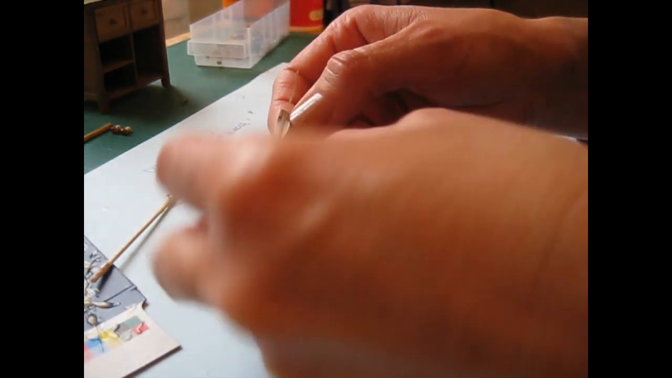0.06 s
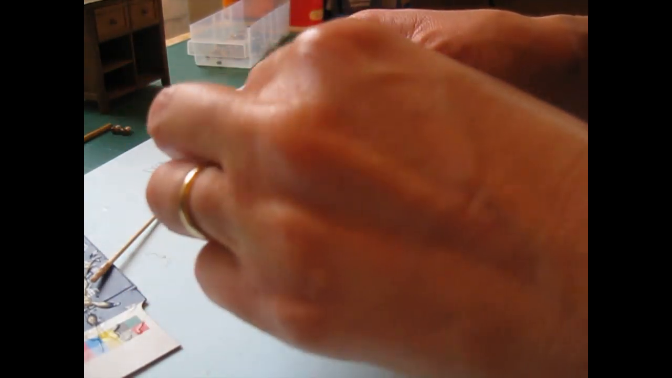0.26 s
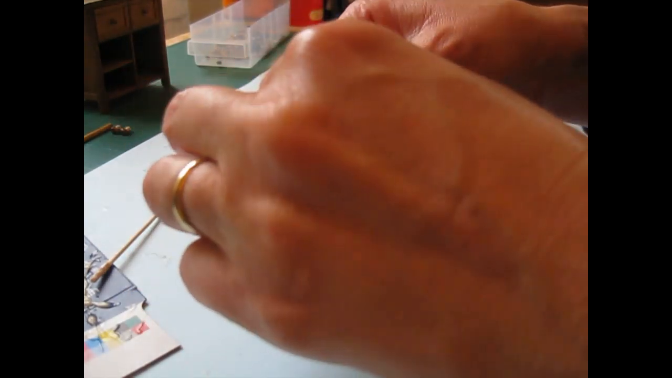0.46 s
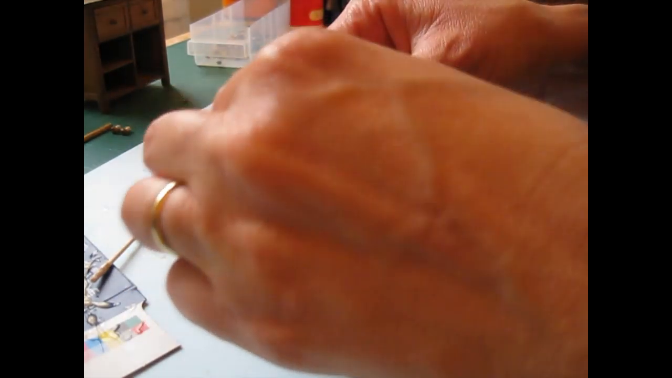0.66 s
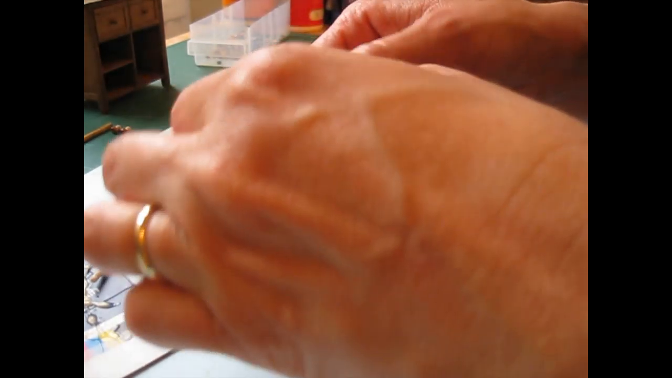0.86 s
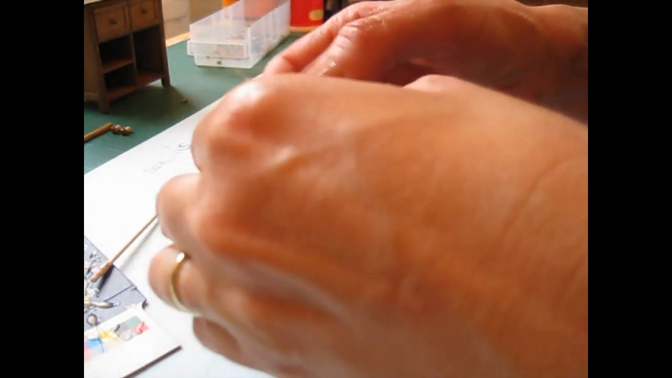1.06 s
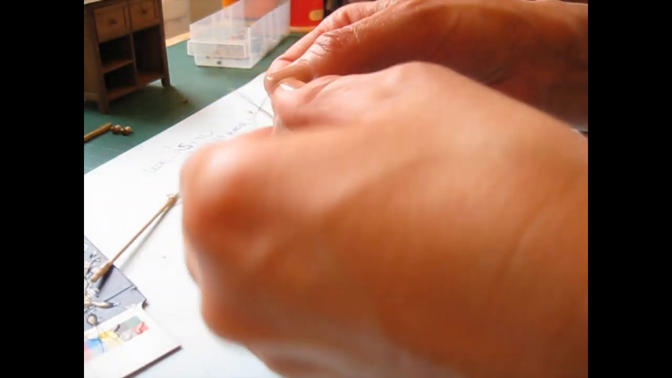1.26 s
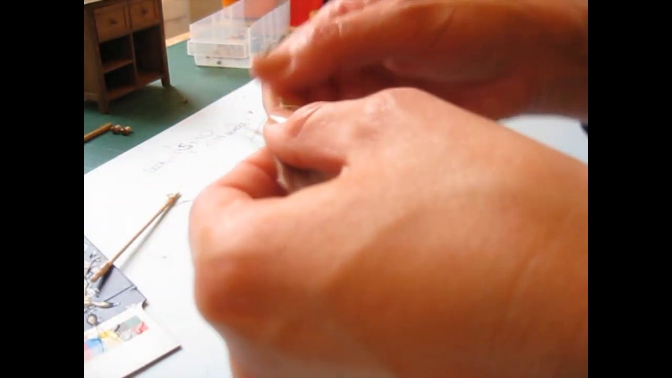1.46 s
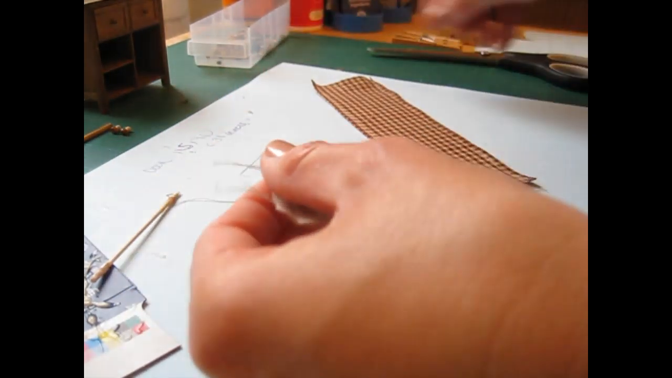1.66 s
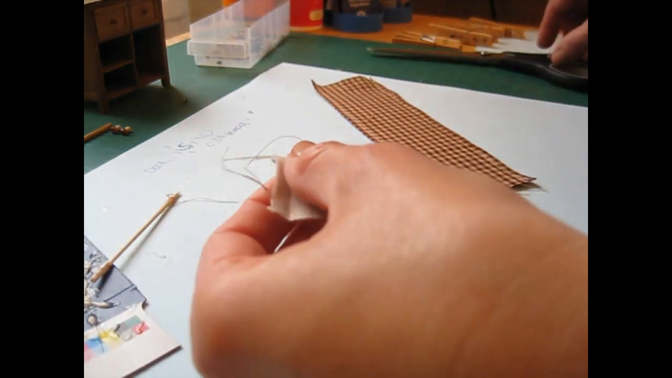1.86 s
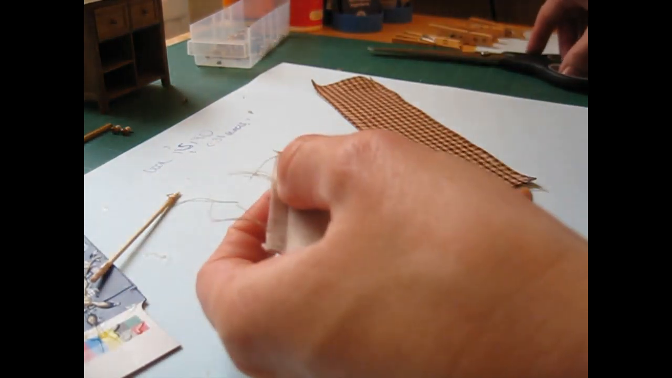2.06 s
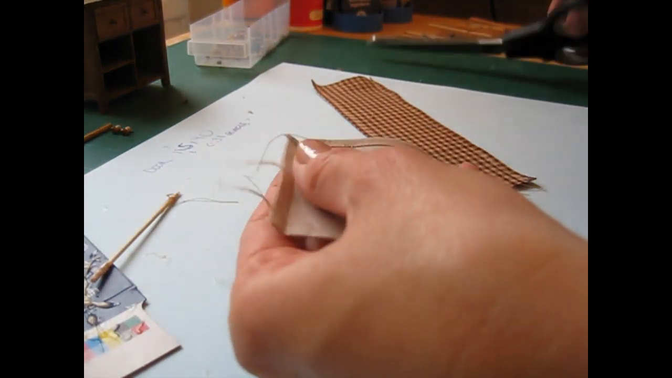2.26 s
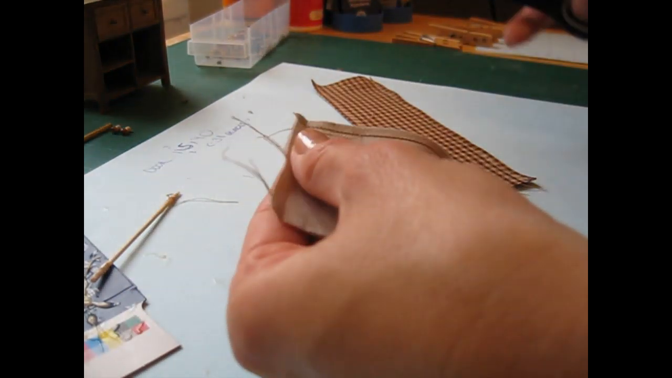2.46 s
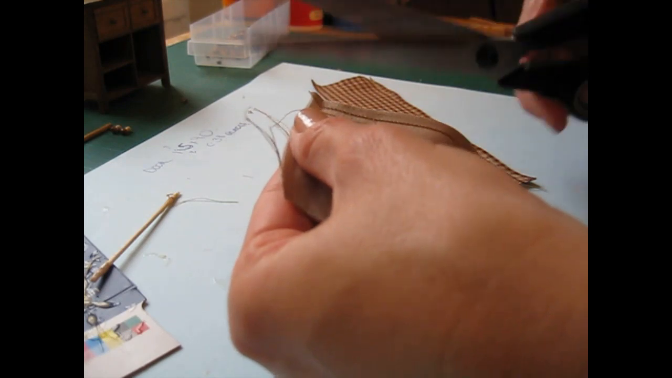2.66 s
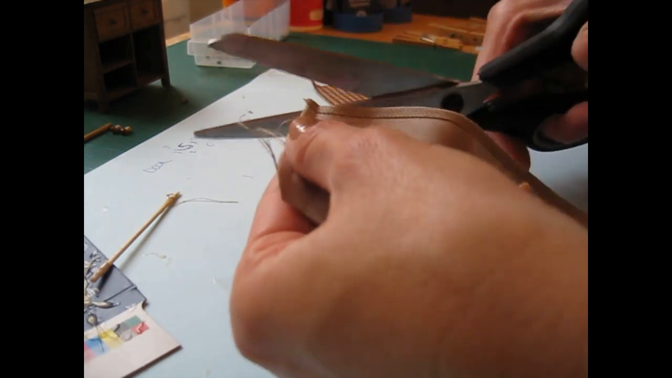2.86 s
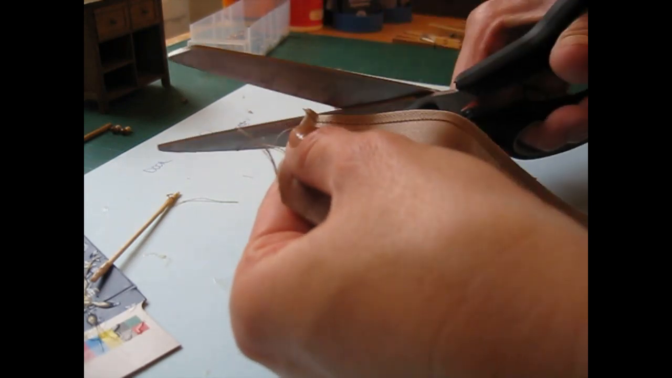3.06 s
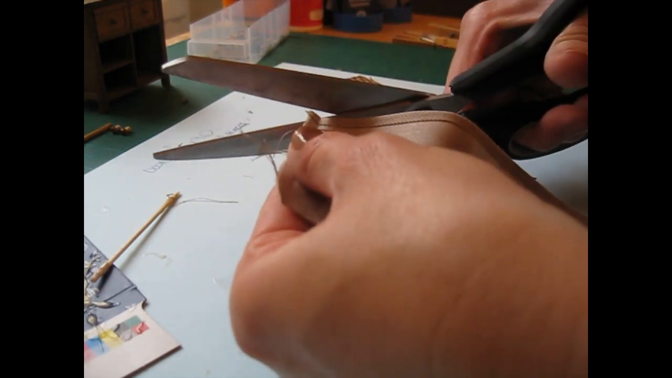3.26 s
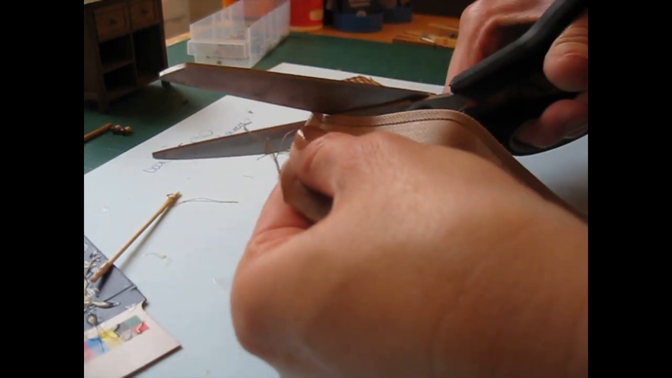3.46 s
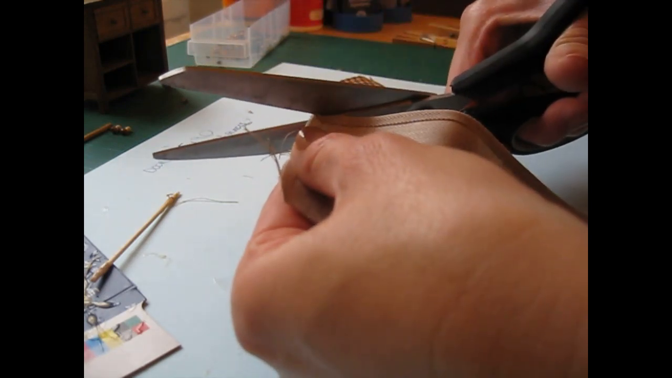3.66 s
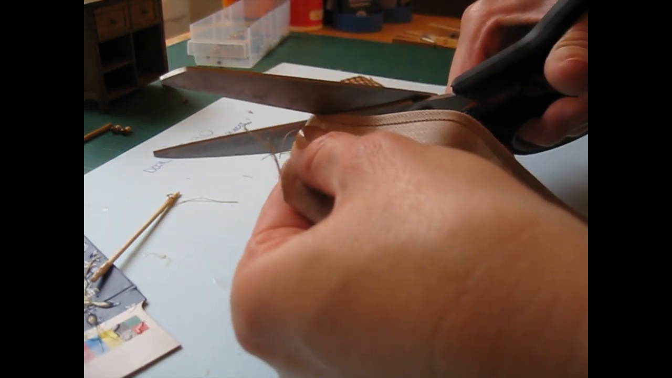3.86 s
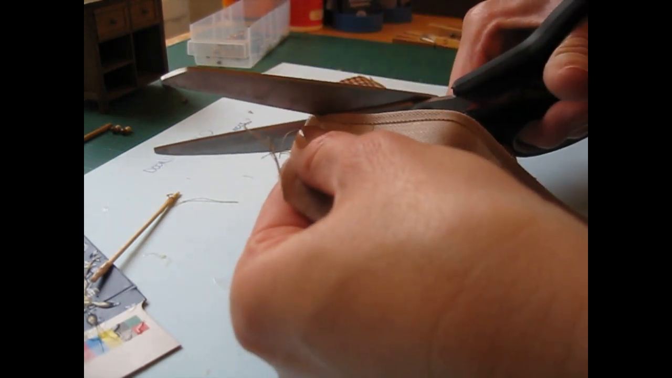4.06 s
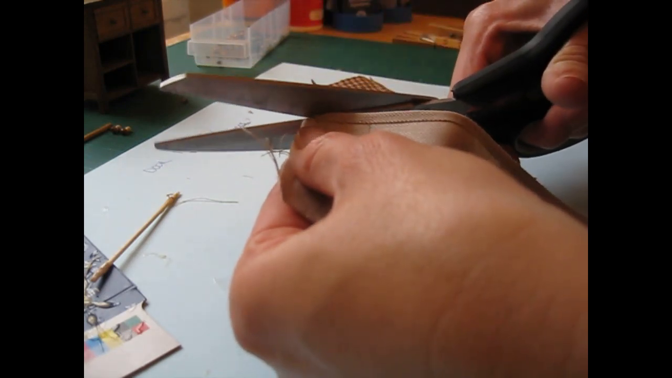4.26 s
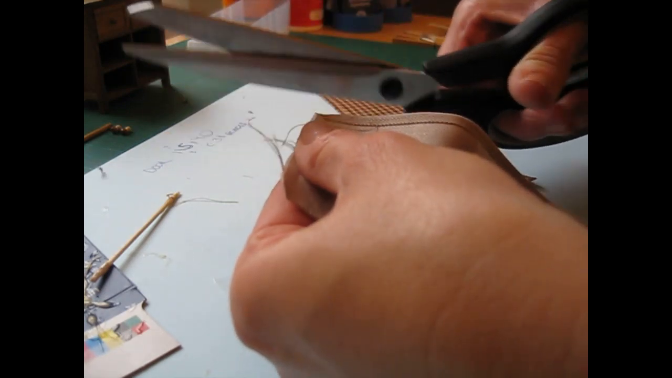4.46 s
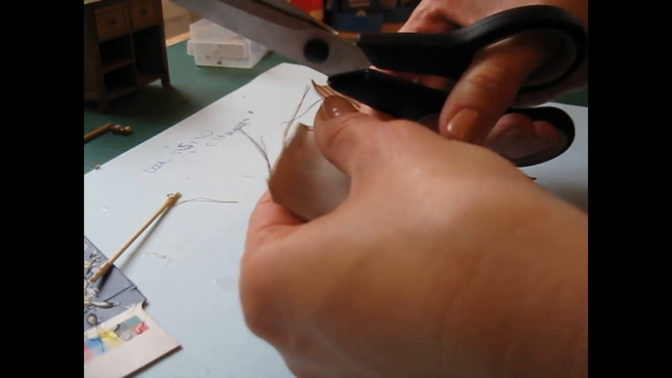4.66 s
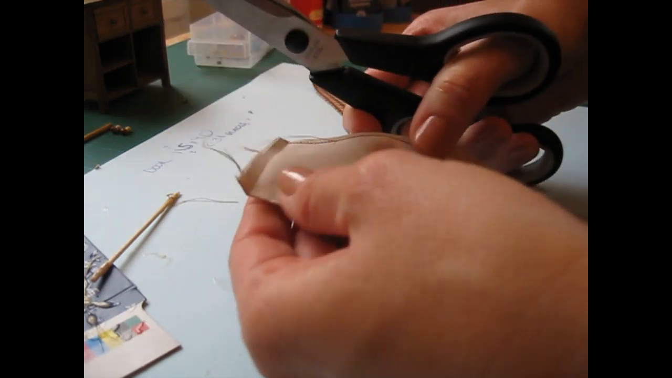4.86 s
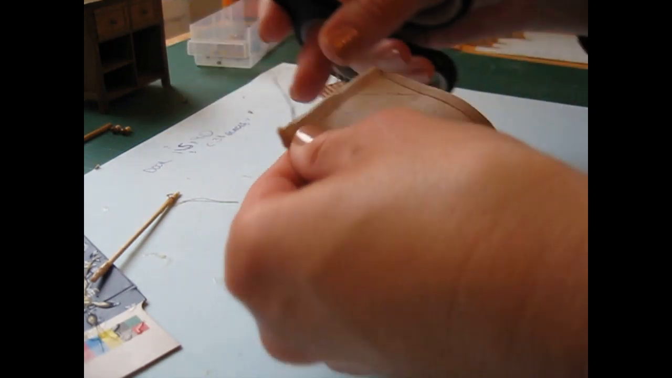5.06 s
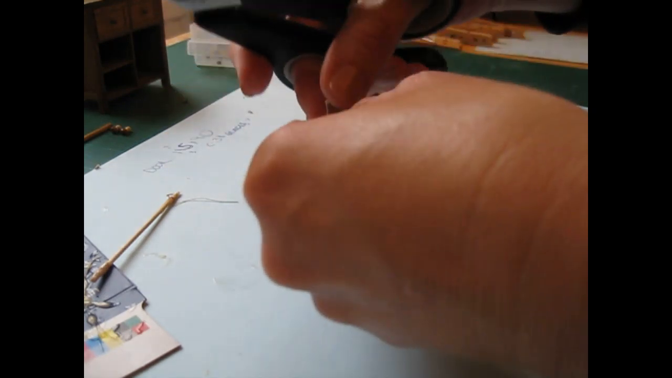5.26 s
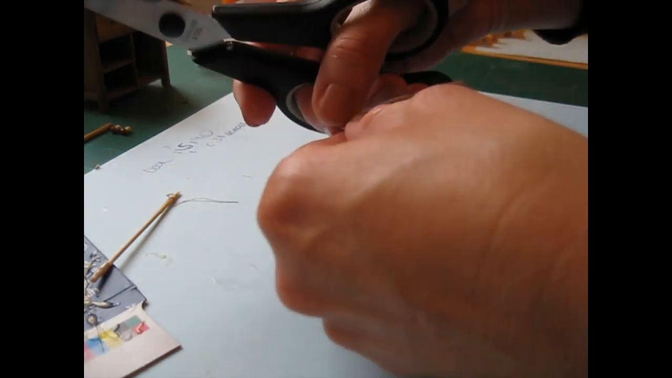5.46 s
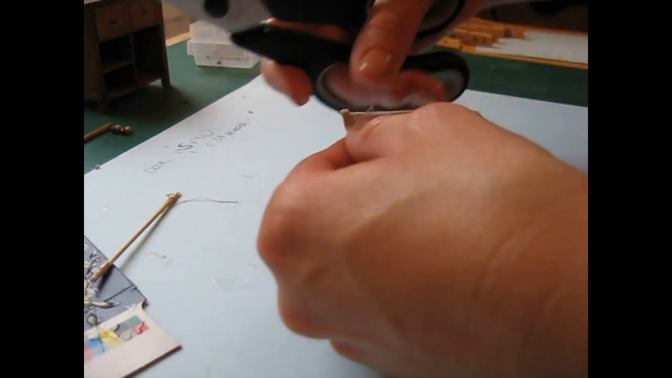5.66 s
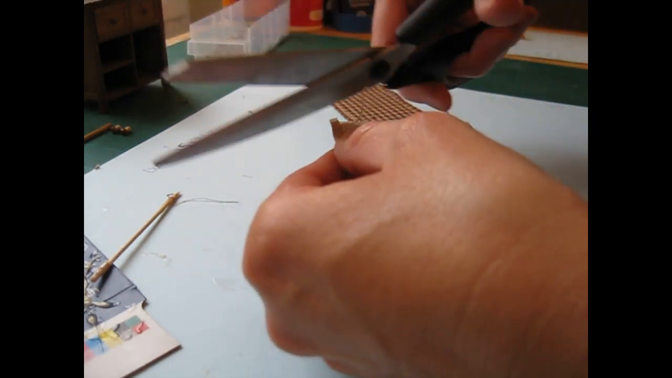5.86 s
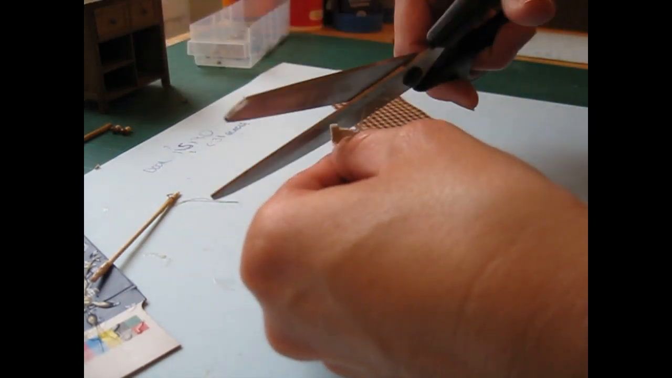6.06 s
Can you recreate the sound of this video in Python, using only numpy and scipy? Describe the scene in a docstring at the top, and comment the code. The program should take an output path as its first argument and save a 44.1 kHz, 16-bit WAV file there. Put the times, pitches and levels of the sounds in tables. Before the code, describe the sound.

A steady, low hiss fills a small, dry room, with everything heard close up. From about 0.3 seconds, fingers fold a scrap of fabric in a few very soft rubs that continue until just past 2 seconds. Between 1.8 and 2.2 seconds, large scissors are picked up from a work table: light knocks, steel ticks and two tiny drags end in a loud knock that briefly rings the tabletop. From 2.4 to 2.7 seconds the blades open in short rasps, the strongest bright and near the end. After a pause, they creep shut in faint scraping pushes from 3.8 to 4.3 seconds, with a thin, rising squeal. One sharp snip cuts a thread at 4.4 seconds, followed by a few tiny clicks. A soft rub, scrape and tick come at 5 seconds, another faint rub at 5.6, and the blades reopen with a brief high squeak at 5.8.

```python
"""Soft rubs of fabric come first: hands fold a scrap close to a small camera.
Large scissors knock and drag on a work table as they are picked up; the steel ticks, the top rings.
The blades rasp open, slide slowly shut with a thin squeal and trim a thread with a sharp snip.
A small, dry room and a steady hiss lie behind it all."""
import sys
import numpy as np
from scipy import signal
from scipy.io import wavfile
from scipy.ndimage import uniform_filter1d

SR = 44100
rng = np.random.default_rng(int(sys.argv[2]) if len(sys.argv) > 2 else 0)


def pcm_store(signal):
    """Save signal as 16-bit PCM."""
    levels = np.round(np.clip(np.atleast_2d(signal), -1, 1) * 32767)
    wavfile.write(sys.argv[1], SR, levels.astype(np.int16).T)


N = 269892

# blades meet or the loose pivot shifts (time [s], level [dB])
CLICKS = [(1.997, -40.5), (2.0505, -41), (2.0766, -39.5), (2.0986, -41.5), (4.4264, -21.5), (4.5060, -39.5),
          (4.5113, -36.5), (4.6196, -47), (5.0508, -46.5)]
# steel snap at full pitch (frequency [Hz], level [dB])
SNAP_SPECTRUM = [(300, -43), (2000, -25), (3100, -19), (3900, -5.5), (4750, 5.5), (5700, -5), (6500, -1),
                 (7500, -12.5), (9500, -17.5), (11500, -14), (13500, -26), (16000, -37)]
# ring after a snap, at full pitch (frequency [Hz], level [dB], t60 [s])
SNAP_MODES = [(4510, -17, 0.14), (4620, 5, 0.21), (5200, 1, .11), (6280, 15, 0.069), (6030, -3, .08)]
# thumb pulls the blades apart (start [s], length [s], level [dB], pitch [ratio])
OPENINGS = [(2.364, .072, -53, 0.98), (2.533, 0.028, -47, 0.61), (2.557, 0.049, -52.5, .75),
            (2.683, 0.018, -33.5, 1.0), (2.704, .016, -41.5, 0.96), (4.999, 0.049, -53.5, 0.83),
            (5.808, 0.025, -45, 0.37)]
# blades creep shut in small pushes (start [s], length [s], level [dB])
CLOSINGS = [(3.841, .025, -62.5), (3.936, 0.03, -53.5), (4.129, 0.038, -53), (4.176, 0.1, -54),
            (4.295, .031, -45.3)]
# hiss of the edges before tilt (frequency [Hz], level [dB])
EDGE_SPECTRUM = [(200, -22), (700, -14), (1900, 3), (2700, -5.5), (4000, 2), (4600, 3), (5500, 1.5),
                 (6050, 1), (6500, 0), (7250, -4), (8800, -3.5), (10000, -7), (12500, -5.5), (16000, -7.5)]
# blade resonances at pitch 1 (frequency [Hz], width [Hz], peak [dB])
BLADE_RESONANCES = [(1490, 190, 1), (1870, 130, 0), (2450, 290, 1), (3320, 110, 6.5), (3900, 770, -3.5)]
# finger settles in the handle (time [s], rise [s], fall [s], level [dB])
GRIPS = [(2.553, 0.0035, 0.0021, -44)]
# rubbed handle (frequency [Hz], level [dB])
HANDLE_SPECTRUM = [(100, -22), (350, -8), (550, 3), (850, -17), (2000, -48), (16000, -60)]
# singing edges (frequency [ratio], level [dB])
SQUEAL_PARTIALS = [(1, 2.5), (.83, -12), (1.88, -4)]
# stick-slip chirps (middle [s], centre frequency [Hz], level [dB])
SQUEAKS = [(2.719, 9350, -49), (4.327, 9200, -49), (4.33, 1410, -53), (5.8155, 14000, -49),
           (5.8255, 10300, -36.5)]
# scissors and fingers hit the table (time [s], table level [dB], tick level [dB], hardness [Hz])
KNOCKS = [(1.8439, -34, -68, 90), (1.9967, -32.5, -45, 350), (2.0504, -32, -36.5, 220),
          (2.0786, -31, -56, 2000), (2.1257, -35, -41, 2500), (2.1775, -35, -54, 1000),
          (2.2168, -19, -20, 2180)]
# ring of the table top (frequency [Hz], level [dB], t60 [s])
TABLE_MODES = [(140.8, -0.5, 0.165), (238, -5.5, 0.11), (304.4, 2.5, 0.18), (390.5, 3, 0.082),
               (448.4, -4, 0.16), (764, -7, 0.056), (880, -4, .1), (947, -4, 0.085), (1028, 1.5, 0.14),
               (1160, -9.5, 0.3), (1400, -22, 0.13), (1630, 0.5, 0.059), (2310, -8, 0.21),
               (2680, -11, 0.16), (3321, -6, 0.13), (4100, -14, .08)]
# its dense modes (frequency [Hz], level [dB])
TABLE_SPECTRUM = [(40, -33), (90, -16), (140, 0.5), (210, -1.5), (400, 3), (650, -4), (1000, -1),
                  (1700, -5.5), (2450, -11), (3000, -5.5), (4300, -11), (7000, -19), (16000, -34)]
# short ring of steel on the table (frequency [Hz], level [dB], t60 [s])
TICK_MODES = [(1370, -3.5, 0.0084), (2464, 6.5, 0.0076), (2720, -10, 0.0045), (4170, 9, 0.0032),
              (5760, -12, 0.0084), (6420, 0, 0.0029), (9900, -13, 0.0033)]
# steel drags over the table (time [s], rise [s], fall [s], level [dB])
DRAGS = [(2.0745, 0.0054, 0.0049, -33.5), (2.109, .006, 0.0031, -36)]
# dragged steel (frequency [Hz], level [dB])
DRAG_SPECTRUM = [(200, -6), (1000, 8), (2800, -4.5), (4500, 7.5), (6000, -4.5), (7200, -19), (9300, -9.5),
                 (11000, -28), (16000, -25)]
# fingers rub the fabric (middle [s], length [s], level [dB], pitch [ratio])
RUBS = [(.268, 0.043, -50.5, 1), (0.548, 0.041, -52.5, 0.95), (0.644, 0.027, -58, 0.66),
        (1.379, 0.27, -58, 0.99), (1.605, 0.059, -55, 1), (2.05, .34, -59, 1), (4.98, .08, -56, .9),
        (5.628, 0.14, -60, 0.93)]
# cloth at pitch 1, before tilt (frequency [Hz], level [dB])
CLOTH_SPECTRUM = [(200, -10.5), (900, -9), (1900, 0.5), (3400, -6.5), (5200, -2), (7000, -8.5),
                  (10000, -11), (12800, -6.5), (16000, -19)]
# reflections off nearby surfaces (base delay [s], base level [dB])
ECHOES = [(.0072, -13), (.0084, -16), (.0099, -10), (0.0144, -24), (0.0205, -31), (.0268, -25)]
# room air and microphone noise (frequency [Hz], level [dB])
HISS_SPECTRUM = [(20, -6), (60, -2.5), (130, -0.5), (270, 0.5), (550, -1), (1050, -3), (1270, -0.5),
                 (1550, -4.5), (3000, -7.5), (6000, -12.5), (8500, -17.5), (10200, -15), (16000, -21)]


def snips(ring_db=-17, dispersion=0.64, octave_down_db=-47, knee_db=3):
    """Steel snaps on steel; the hand damps all but a faint ring. Weak clicks are duller."""
    out = np.zeros(N)
    for s, db in CLICKS:
        pitch = 1 / (1 + np.exp((octave_down_db - db) / knee_db))
        snap = colour(SNAP_SPECTRUM, pitch)
        for _ in range(4):  # bending waves: the treble runs ahead along the blade
            snap = signal.lfilter([-dispersion, 1], [1, -dispersion], snap)
        add(out, s, amp(db) * impact(snap))
        add(out, s, amp(db + ring_db) * impact(struck(SNAP_MODES, pitch)))
    return out


def blades(closing_pitch=0.565):
    """A bright rasp opening, a duller scrape closing, a finger rubbing the handle."""
    out = np.zeros(N)
    for s, length_s, db, pitch in OPENINGS:
        add(out, s, slide(length_s, db, pitch, tilt_db_oct=7 + 4.5 * np.log2(pitch)))
    for s, length_s, db in CLOSINGS:
        tilt_db_oct = -1.2 + 0.33 * (db + 50)  # faster pushes are brighter
        add(out, s, slide(length_s, db, closing_pitch, tilt_db_oct))
    return out + strokes(GRIPS, colour(HANDLE_SPECTRUM), grain_db=5)


def slide(length_s, db, pitch, tilt_db_oct):
    """Sliding edges hiss and stir broad blade resonances; pitch stands for the crossing point."""
    modes = [(hz, peak_db + 20 * np.log10(width_hz), np.log(1000) / np.pi / width_hz)
             for hz, width_hz, peak_db in BLADE_RESONANCES]
    band = signal.butter(2, [1150 * pitch, 4800 * pitch], "bandpass", fs=SR)
    speed = push(length_s, db)
    ring = friction(signal.lfilter(*band, struck(modes, pitch)), speed, grain_db=0.5)
    ring_db = -2 + 0.45 * (db + 40)  # hard slides ring more
    edge = friction(colour(EDGE_SPECTRUM, tilt_db_oct=tilt_db_oct), speed, grain_db=2)
    return edge + amp(ring_db) * ring


def push(length_s, db):
    """Blade speed in one movement: attack, hold, release. Longer movements ramp more gently."""
    stretch = (length_s / 0.03) ** 0.55
    attack_s, release_s = 0.0151 * stretch, 0.0078 * stretch
    t = np.arange(0, length_s + 5 * release_s, 1 / SR)
    return amp(db) * np.minimum(t / attack_s, 1) * np.exp(-np.maximum(t - length_s, 0) / release_s)


def squeal(start_hz=6780, rise_hz=1210, start_db=-5.5, fade_db=-12):
    """Closing edges sing with their speed, rising and fading as the crossing point runs to the tips."""
    speed = np.zeros(N)
    for s, length_s, db in CLOSINGS:
        add(speed, s, push(length_s, db))
    travel = np.cumsum(speed) / speed.sum()
    hz = start_hz + rise_hz * travel
    partials = sum(amp(db) * stick_slip(ratio * hz, jitter=0.026) for ratio, db in SQUEAL_PARTIALS)
    return speed * amp(start_db + fade_db * travel) * partials


def squeaks(chirp_s=0.013, glide_oct_per_s=14.3, overhang_s=0.0151):
    """Edges stick and slip in a fast slide: chirps glide up while closing, otherwise down."""
    out, t = np.zeros(N), np.arange(-chirp_s / 2, chirp_s / 2, 1 / SR)
    for s, hz, db in SQUEAKS:
        closing = any(0 < s - start_s < length_s + overhang_s for start_s, length_s, _ in CLOSINGS)
        glide = 2 ** (glide_oct_per_s * (t if closing else -t))
        add(out, s + t[0], amp(db) * np.hanning(len(t)) * stick_slip(hz * glide, jitter=0.033))
    return out


def table(body_t60_s=0.15, body_db=1, chatter_db=-17, chatter_s=0.00042, contact_s=0.00021):
    """Steel ticks, chatters and drags; the table top rings, mainly in its low modes under soft blows."""
    out, t = np.zeros(N), np.arange(SR // 3) / SR
    tick = impact(struck(TICK_MODES) * (1 - np.exp(-t / contact_s)))
    ring = impact(struck(TABLE_MODES))
    for s, db, tick_db, hardness_hz in KNOCKS:
        dense, chatter = rng.standard_normal((2, len(t)))
        body = signal.fftconvolve(dense * amp(-60 * t / body_t60_s), colour(TABLE_SPECTRUM))[:len(t)]
        lowpass = signal.butter(1, hardness_hz, fs=SR)
        top = signal.lfilter(*lowpass, ring + amp(body_db) * impact(body))
        add(out, s, amp(db) * impact(top))
        steel = amp(tick_db) * (tick + amp(chatter_db) * impact(chatter * np.exp(-t / chatter_s)))
        add(out, s - 0.000937, amp(-11) * steel)  # one blade lands just before the other
        add(out, s, steel)
    return out + strokes(DRAGS, colour(DRAG_SPECTRUM), grain_db=3.5)


def fabric():
    """Fibres catch on skin as the scrap is folded; longer, slower rubs are duller."""
    out = np.zeros(N)
    for s, length_s, db, pitch in RUBS:
        cloth = colour(CLOTH_SPECTRUM, pitch, tilt_db_oct=-1.5 - 0.8 * np.log2(length_s / 0.05))
        out += strokes([(s, length_s / 2, length_s / 2, db)], cloth, grain_db=5)
    return out


def room(x, path_ratio, echo_db, tail_db, t60_s=0.18, build_s=0.0046, lowpass_hz=8000):
    """Direct sound plus a few duller reflections and a short diffuse tail."""
    t = np.arange(SR // 3) / SR
    response = rng.standard_normal(len(t)) * amp(-60 * t / t60_s) * (1 - np.exp(-t / build_s))
    response *= amp(tail_db) / np.linalg.norm(response)
    for delay_s, db in ECHOES:
        add(response, delay_s * path_ratio, amp([db + echo_db]))
    response = signal.lfilter(*signal.butter(2, lowpass_hz, fs=SR), response)
    return x + signal.fftconvolve(x, response)[:N]


def hiss(rms_db=-55):
    """Steady room air and microphone noise."""
    noise = signal.fftconvolve(rng.standard_normal(N), colour(HISS_SPECTRUM, size=8192))[:N]
    return amp(rms_db) * unit_rms(noise)


def strokes(rows, response, grain_db):
    """Friction under bell-shaped swells, one per row."""
    out = np.zeros(N)
    for s, rise_s, fall_s, db in rows:
        t = np.arange(-round(3 * rise_s * SR), round(3 * fall_s * SR)) / SR
        swell = np.exp(-0.5 * (t / np.where(t < 0, rise_s, fall_s)) ** 2)
        add(out, s + t[0], amp(db) * friction(response, swell, grain_db))
    return out


def friction(response, swell, grain_db):
    """A swell of tiny uneven catches, each ringing the response."""
    n = len(swell)
    noise = rng.standard_normal(n)
    grain = amp(grain_db * np.repeat(rng.standard_normal(n), 16)[:n])
    return unit_rms(signal.fftconvolve(noise * grain, response)[:n]) * swell


def stick_slip(hz, jitter):
    """An unsteady tone along a pitch curve."""
    wobble = unit_rms(uniform_filter1d(rng.standard_normal(len(hz)), size=30))
    return np.sqrt(2) * np.sin(2 * np.pi * np.cumsum(hz * (1 + jitter * wobble)) / SR)


def struck(modes, pitch=1):
    """Decaying sines of alternating sign."""
    t = np.arange(SR // 3) / SR
    return sum((-1) ** k * amp(db - 60 * t / t60_s) * np.sin(2 * np.pi * hz * pitch * t)
               for k, (hz, db, t60_s) in enumerate(modes))


def colour(spectrum, pitch=1, tilt_db_oct=0, size=2048):
    """Minimum-phase impulse response of a spectrum, pitch-shifted and tilted about 5 kHz."""
    hz = np.abs(np.fft.fftfreq(size, 1 / SR)) + 10
    point_hz, point_db = np.transpose(spectrum)
    db = np.interp(np.log(hz / pitch), np.log(point_hz), point_db)
    db += tilt_db_oct * np.log2(np.maximum(hz, 500) / 5000)
    log_response = np.conj(signal.hilbert(np.log(amp(db))))
    return np.fft.ifft(np.exp(log_response)).real[:size // 2]


def amp(db):
    """Decibels to gain."""
    return 10 ** (np.asarray(db) / 20)


def unit_rms(x):
    """Scales to rms 1."""
    return x / np.sqrt(np.mean(x ** 2) + 1e-20)


def impact(x):
    """Scales to the energy of 100 samples at rms 1."""
    return 10 * x / np.linalg.norm(x)


def add(mix, s, sound):
    """Mixes a sound in at time s."""
    part = mix[max(round(s * SR), 0):][:len(sound)]
    part += sound[:len(part)]


def scene():
    """Reflections travel farther from the table top than from the raised hands."""
    on_table = room(table(), path_ratio=1.3, echo_db=-3, tail_db=-11)
    handling = snips() + blades() + squeal() + squeaks() + fabric()
    in_hand = room(handling, path_ratio=0.98, echo_db=-3.5, tail_db=-11.5)
    return (on_table + in_hand + hiss())[None]


def record(dry, notch_hz=7930, notch_width_hz=850, cutoff_hz=15850):
    """Camera: narrow treble notch, steep band limit."""
    notched = signal.lfilter(*signal.iirnotch(notch_hz, notch_hz / notch_width_hz, fs=SR), dry)
    lowpass = signal.firwin(511, cutoff_hz, window=("kaiser", 8), fs=SR)
    return signal.oaconvolve(notched, lowpass[None], "same")


dry = scene()
out = record(dry)
pcm_store(out)
```